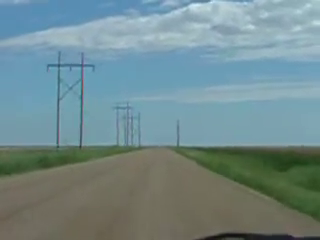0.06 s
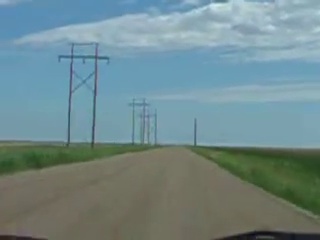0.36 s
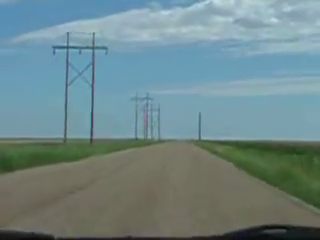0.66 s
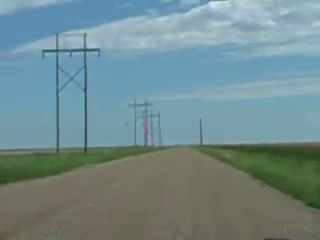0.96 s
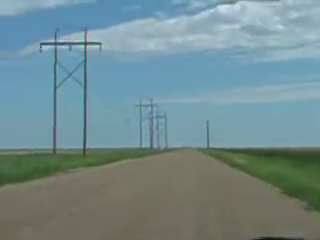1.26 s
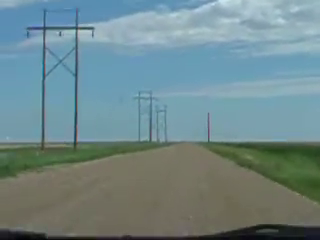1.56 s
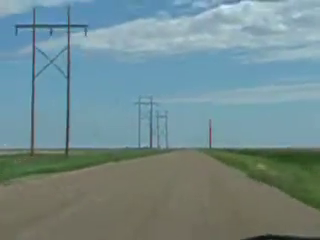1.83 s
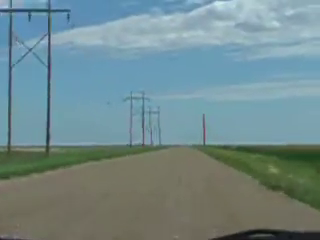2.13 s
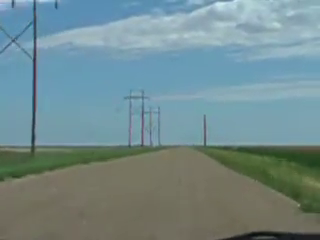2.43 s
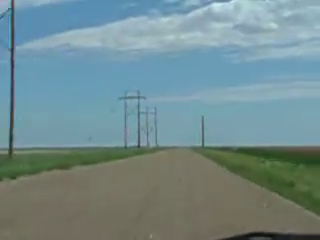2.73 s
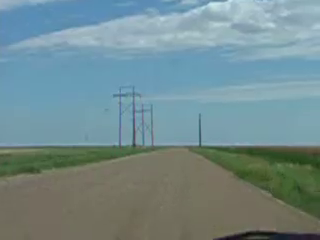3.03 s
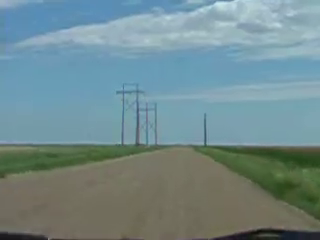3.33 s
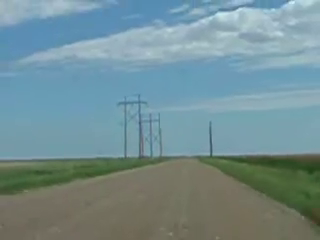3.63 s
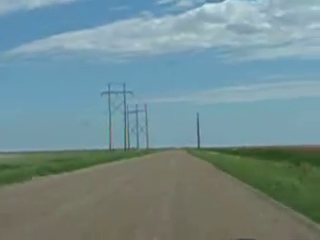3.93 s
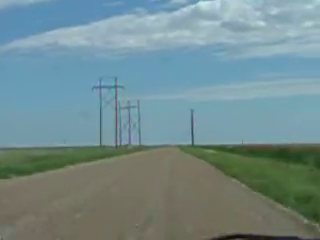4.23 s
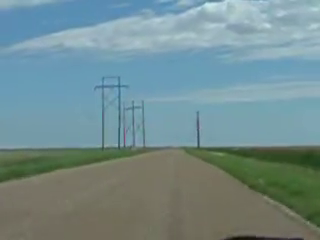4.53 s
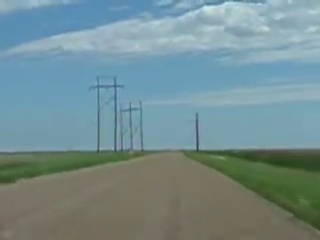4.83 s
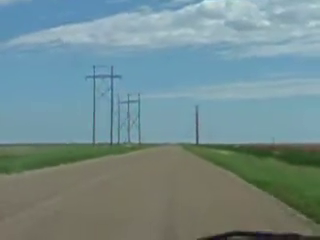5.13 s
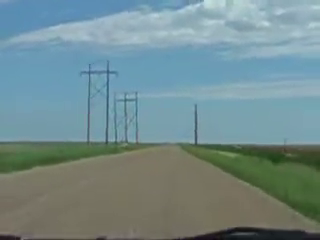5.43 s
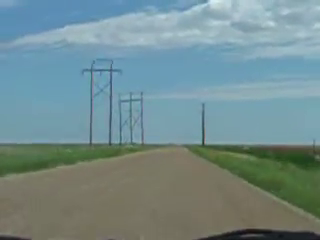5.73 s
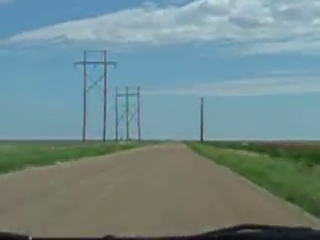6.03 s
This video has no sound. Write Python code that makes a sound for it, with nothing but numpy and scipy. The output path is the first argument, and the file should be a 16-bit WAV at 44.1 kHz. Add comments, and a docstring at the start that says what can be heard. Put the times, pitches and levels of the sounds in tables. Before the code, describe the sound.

A steady low road rumble fills a moving car, with gravel crunching, scattered stone ticks and dull thuds from ruts.

```python
"""Tyres on a gravel road at steady speed, heard from inside the car, microphone behind the windscreen.
All around, the uneven road shakes the body and booms in the cabin, and ruts land as low thuds.
Below, the tread crunches and sprays grit into the wheel arches. Single stones tick against the
underside, and one sets a metal part ringing. A faint electronic whine stays on throughout."""
import sys
import numpy as np
from scipy import signal
from scipy.fft import rfft, irfft
from scipy.io import wavfile

SR = 44100
rng = np.random.default_rng(int(sys.argv[2]) if len(sys.argv) > 2 else 0)


def log_audio(samples):
    """Write samples as a 16-bit WAV file to the path given in sys.argv[1]."""
    # one column per channel
    frames = np.atleast_2d(samples).T
    # limit to full scale, then quantise
    limited = np.clip(frames, -1, 1)
    pcm = np.round(limited * 32767).astype(np.int16)
    wavfile.write(sys.argv[1], SR, pcm)


N = 276507

# cabin air and panel resonances around the microphone: centre_hz, width_hz, lift_db
CABIN_RESONANCES = [(52.4, 4, 1.5), (70, 14, 4), (103, 17, 6), (135, 9.1, 9.5), (172, 16, 4.5),
                    (215, 4.7, 1.5), (324, 26, 3.5), (458.2, 9.3, 5.5), (502.6, 3.2, 5.5),
                    (565.3, 6.7, 6.5), (684, 80, 5.5), (1235, 110, 4), (1503, 21, 2.5), (1817, 57, 5),
                    (2610, 190, 5), (3960, 57, 0.5), (4340, 250, 2.5)]
# spectrum of each road layer before the cabin colours it: frequency_hz, relative_db
SHAKE_SPECTRUM = [(12, -9.5), (24, -3.5), (45, 1.5), (66, 0.5), (85, -16), (130, -45)]
BOOM_SPECTRUM = [(55, -26.5), (80, 3), (100, 4.5), (140, 2.5), (190, -0.5), (240, -20.5), (350, -34)]
ROAR_SPECTRUM = [(140, -18.5), (220, 2), (280, -1), (380, 0.5), (520, -5.5), (680, -12), (850, -11.5),
                 (1050, -19.5), (1400, -26.5), (2500, -34.5)]
CRUNCH_SPECTRUM = [(700, -12.5), (1150, -4), (1600, -5.5), (2200, -6), (2800, -14.5), (3600, -14.5),
                   (6000, -26.5)]
SPRAY_SPECTRUM = [(1800, -15.5), (3000, 2), (3800, -1.5), (5000, -1), (6500, -0.5), (7500, -4), (8800, -18)]
# roughness of the road under the tyres: time_s, relative_db
ROUGHNESS = [(0, -20.5), (0.1, -19.5), (0.22, -25.5), (0.8, -20), (1.2, -19.5), (1.65, -23), (1.95, -19),
             (2.1, -22), (2.65, -20.5), (3.1, -22), (3.35, -26), (3.7, -23), (4.1, -21), (4.65, -24.5),
             (5.05, -21), (5.8, -21.5), (6.05, -21.5), (6.27, -27.5)]
# longer waves in the road rock the body on its springs: time_s, shake_db
ROAD_SWELL = [(0, -25), (0.45, -26), (0.78, -23), (1.05, -22), (1.35, -22), (2.1, -26), (2.42, -22.5),
              (3.2, -26.5), (3.5, -31), (3.85, -25), (4.7, -27), (5.25, -19.5), (5.5, -25.5), (5.8, -18),
              (6.27, -33.5)]
# patches of loose gravel: start_s, length_s, spray_rise_db
LOOSE_PATCHES = [(-0.05, 0.45, 3), (0.633, 0.24, 2.5), (1.223, 0.16, 3.5), (1.45, 0.13, 5),
                 (2.287, 0.63, 2.5), (4.418, 0.09, 5), (4.89, 0.25, 1.5), (5.175, 0.15, 3),
                 (5.526, 0.39, 4)]
# stones on the underside: start_s, level_db, brightness_db_per_octave, spot_pitch_hz, spot_level_db
STONE_HITS = [(0.065, -48, -7.5, 1900, -52), (0.173, -50.5, -9, 4360, -35), (0.710, -45.5, -4.5, 3830, -45),
              (0.755, -54, -12, 4450, -44), (0.78, -55, -6, 2320, -40), (0.834, -54, -6, 2800, -44),
              (1.338, -49, -10.5, 1390, -42), (1.442, -51, 2, 6360, -45), (1.513, -48, -8, 5300, -49),
              (1.533, -42.5, -5.5, 2400, -40), (1.557, -42.5, -3, 4070, -41), (1.924, -45, -4, 2850, -40),
              (2.369, -40, -1.5, 3840, -37), (2.518, -46, -7, 4800, -47), (2.566, -40.5, -5.5, 1380, -30.5),
              (2.613, -47.5, -4, 1550, -38), (2.663, -50.5, 3, 6000, -37.5), (2.728, -44.5, -7, 1020, -25),
              (2.731, -51, 5, 2470, -34), (2.912, -49.5, -7, 6550, -49), (3.062, -42, -4, 6550, -41),
              (3.235, -49, -6.5, 1760, -47), (3.470, -44.5, -2, 6830, -43), (4.033, -56, 2, 4900, -60),
              (5.273, -49, -7, 5840, -49), (5.337, -61, 0, 4360, -43), (5.456, -48, -1, 2450, -37.5),
              (5.54, -48, -3, 6300, -43), (5.74, -43, -3, 2950, -43), (5.816, -48.5, -10, 2580, -41),
              (5.866, -57, -15, 4380, -34), (6.137, -41.5, -3, 4160, -45)]
# the floor pan's modes, shared by all stones: pitch_hz, relative_db
FLOOR_PAN_MODES = [(1143, 0), (2300, -2), (3800, 2.5), (5200, 3), (6700, 2.5)]
# ruts that jolt the suspension: start_s, level_db, pitch_hz
RUTS = [(0.106, -8, 123), (0.731, -7, 47.7), (1.145, -9, 64.5), (1.347, -5, 55), (2.464, -14, 50.7),
        (2.89, -4.5, 127), (3.215, -2, 66.5), (3.828, -10, 50.4), (5.143, -7.5, 101), (5.245, -7, 52),
        (6.069, -8, 55.3)]
# modes of a bare metal part: pitch_hz, relative_db, t60_s
METAL_MODES = [(6400, 0, .45), (6540, -11, .4), (6923, -8, .5)]


def from_db(db):
    """Decibels to gain."""
    return 10 ** (np.asarray(db) / 20)


def unit_rms(x):
    """Scale to rms 1."""
    return x / np.sqrt(np.mean(x ** 2) + 1e-20)


def curve(rows):
    """A table of times and values, read at every sample."""
    times, values = np.transpose(rows)
    return np.interp(np.arange(N) / SR, times, values)


def drift(rate_hz):
    """A smooth random wander, mostly slower than rate_hz; rms 1."""
    step, settle = 40, 2000
    pole = np.exp(-2 * np.pi * rate_hz * step / SR)
    noise = rng.standard_normal(N // step + settle + 2)
    slow = signal.lfilter([1], [1, -2 * pole, pole ** 2], noise)[settle:]
    return np.interp(np.arange(N) / step, np.arange(len(slow)), unit_rms(slow))


def resonate(x, hz, width_hz):
    """Two-pole resonance with gain 1 at its peak."""
    r = np.exp(-np.pi * width_hz / SR)
    gain = (1 - r * r) / 2
    return signal.lfilter([gain, 0, -gain], [1, -2 * r * np.cos(2 * np.pi * hz / SR), r * r], x)


def add(out, start_s, sound):
    """Mix a sound in at start_s."""
    start = int(start_s * SR)
    out[start:start + len(sound)] += sound[:N - start]


def through_cabin(force, spectrum):
    """The path to the microphone: a force takes on its spectrum and the cabin's resonances; rms 1."""
    hz = np.maximum(np.arange(N // 2 + 1) * SR / N, 1)
    points_hz, levels_db = np.transpose(spectrum)
    db = np.interp(np.log(hz), np.log(points_hz), levels_db, left=-70, right=-70)
    for centre_hz, width_hz, lift_db in CABIN_RESONANCES:
        db += lift_db / (1 + (2 * (hz - centre_hz) / width_hz) ** 2)
    return unit_rms(irfft(rfft(force) * from_db(db), N))


def road_rumble(rough_db, boom_db=-21.5, roar_db=-26.5):
    """All around: countless bumps push at random on the body, harder where the road is rough."""
    shake = from_db(curve(ROAD_SWELL)) * through_cabin(rng.standard_normal(N), SHAKE_SPECTRUM)
    boom = from_db(boom_db + 1.26 * rough_db) * through_cabin(rng.standard_normal(N), BOOM_SPECTRUM)
    roar = from_db(roar_db + 0.95 * rough_db) * through_cabin(rng.standard_normal(N), ROAR_SPECTRUM)
    return shake + boom + roar


def loose_gravel_db(edge_s=0.05):
    """The spray's rise as the tyres roll into each loose patch, cross it and leave it."""
    t = np.arange(N) / SR
    return sum(rise_db * np.clip(np.minimum(t - start_s, start_s + length_s - t) / edge_s, 0, 1)
               for start_s, length_s, rise_db in LOOSE_PATCHES)


def pebbles(per_s, spread_db, t60_s):
    """Pebbles land at random, each a brief rattle, over an equally loud bed of fine sand."""
    sizes = from_db(spread_db * np.minimum(rng.exponential(1, N), 4))
    landings = rng.random(N) < per_s / SR
    power_decay = from_db(-60 / (t60_s * SR)) ** 2
    power = signal.lfilter([1], [1, -power_decay], landings * sizes ** 2 + 1e-18)
    return np.sqrt(power / power.mean() + 1) * rng.standard_normal(N)


def tyre_gravel(rough_db):
    """At the wheels: gravel grinds under the tread and flies up in clumps, more where it lies loose."""
    loose_db = loose_gravel_db()
    crunch_db = -48 + 0.23 * rough_db + 0.89 * loose_db
    spray_db = -53 + 0.25 * rough_db + loose_db
    clumps = from_db(0.6 * drift(25))
    looseness = from_db(spray_db - spray_db.mean())
    crunch = through_cabin(pebbles(260 * looseness, spread_db=9, t60_s=0.32), CRUNCH_SPECTRUM)
    spray = through_cabin(pebbles(220 * looseness, spread_db=2.6, t60_s=0.035), SPRAY_SPECTRUM)
    return clumps * (from_db(crunch_db) * crunch + from_db(spray_db) * spray)


def electronic_whine(pitch_hz=5550, wobble_hz=1.5, level_db=-62, flutter_db=1.3):
    """Faint in the cabin: a thin electronic tone that wavers slightly in level and pitch."""
    hz = pitch_hz + wobble_hz * drift(12)
    gain = from_db(level_db + flutter_db * drift(14))
    return gain * np.sin(2 * np.pi * np.cumsum(hz) / SR)


def struck_panel(modes, t60_s, clatter, ring_width_hz, clatter_spread, rise_s=0.002):
    """A panel rings at its modes amid a clatter of lesser ones; reflections smear the blow."""
    t = np.arange(SR // 6) / SR
    envelope = (1 - np.exp(-t / rise_s)) * from_db(-60 * t / t60_s)

    def cluster(hz, width_hz):
        """Modes round one pitch, dying together; rms 1."""
        band = resonate(rng.standard_normal(len(t)), hz, width_hz)
        return unit_rms(envelope * resonate(band, hz, width_hz))

    sound = np.zeros(len(t))
    for hz, db in modes:
        ring = cluster(hz, ring_width_hz)
        rattle = cluster(hz, clatter_spread * np.sqrt(hz))
        sound += from_db(db) * unit_rms(ring + clatter * rattle)
    return sound * np.sqrt(np.mean(envelope ** 2)) / envelope.max()  # levels hold at the crest


def stone_ticks(middling_db=-47, doubling_db=11.5, pivot_hz=3000):
    """Just under the floor: each stone thrown by a tyre rattles the pan and rings the spot it hits."""
    out = np.zeros(N)
    for start_s, level_db, brightness, spot_hz, spot_db in STONE_HITS:
        linger = 2 ** ((level_db - middling_db) / doubling_db)  # heavier stones ring longer
        pan_modes = [(hz, level_db + db + brightness * np.log2(hz / pivot_hz))
                     for hz, db in FLOOR_PAN_MODES]
        pan = struck_panel(pan_modes, t60_s=0.074 * linger,
                           clatter=1, ring_width_hz=800, clatter_spread=36)
        spot = struck_panel([(spot_hz, spot_db)], t60_s=0.081 * linger,
                            clatter=0.61, ring_width_hz=300, clatter_spread=25)
        add(out, start_s, pan + spot)
    return out


def rut_thuds(t60_s=0.18, rise_s=0.0055):
    """Up through the suspension: each rut kicks the body, which thuds for a few cycles."""
    out, t = np.zeros(N), np.arange(SR // 3) / SR
    envelope = (1 - np.exp(-t / rise_s)) * from_db(-60 * t / t60_s)
    for start_s, level_db, pitch_hz in RUTS:
        add(out, start_s, from_db(level_db) * envelope * np.sin(2 * np.pi * pitch_hz * t))
    return out


def metal_ping(start_s=3.739, level_db=-46.5):
    """Under the car: one stone glances off stiff metal, which rings on."""
    out, t = np.zeros(N), np.arange(SR // 2) / SR
    for pitch_hz, relative_db, t60_s in METAL_MODES:
        envelope = from_db(level_db + relative_db - 60 * t / t60_s)
        add(out, start_s, envelope * np.sin(2 * np.pi * pitch_hz * t))
    return out


def scene():
    """Everything as heard from one spot behind the windscreen, in mono."""
    rough_db = curve(ROUGHNESS)
    rough_db -= rough_db.mean()  # 0 dB is average road
    road = road_rumble(rough_db) + tyre_gravel(rough_db)
    impacts = stone_ticks() + rut_thuds() + metal_ping()
    return (road + impacts + electronic_whine())[None]


def record(dry):
    """A small camera's microphone, its treble falling steeply above about 8 kHz."""
    stopband_hz = 9594
    return signal.sosfilt(signal.cheby2(14, 70, stopband_hz, fs=SR, output="sos"), dry)


dry = scene()
out = record(dry)
log_audio(out)
```